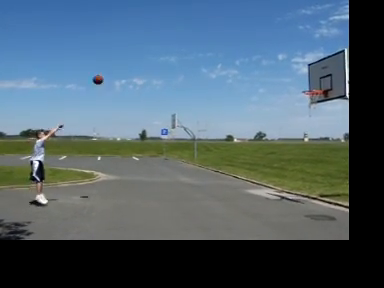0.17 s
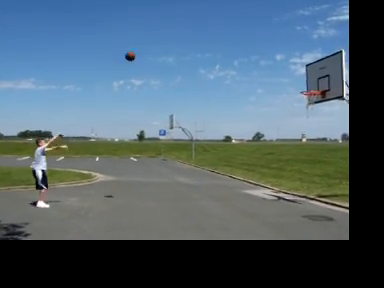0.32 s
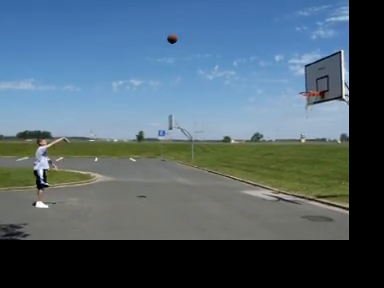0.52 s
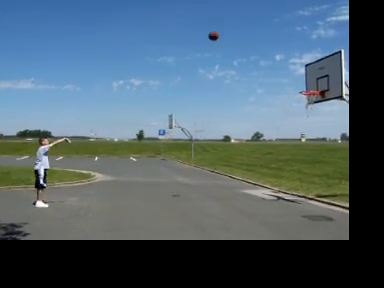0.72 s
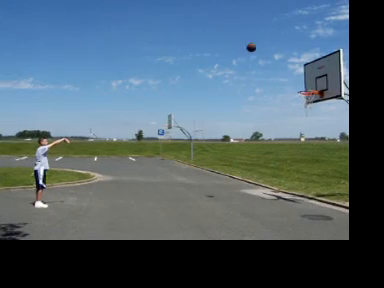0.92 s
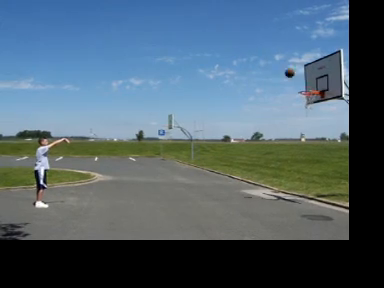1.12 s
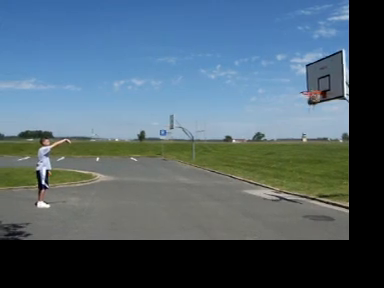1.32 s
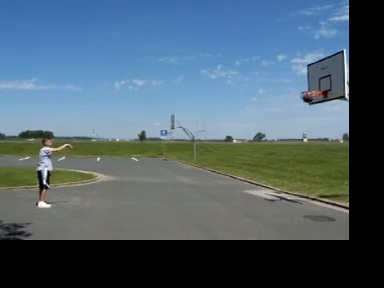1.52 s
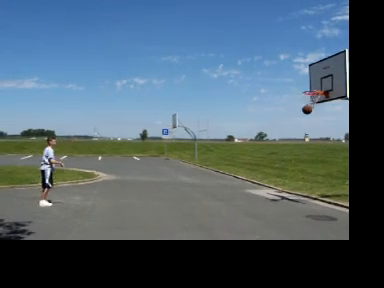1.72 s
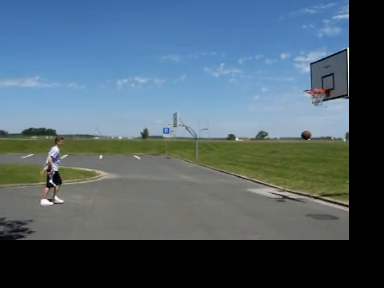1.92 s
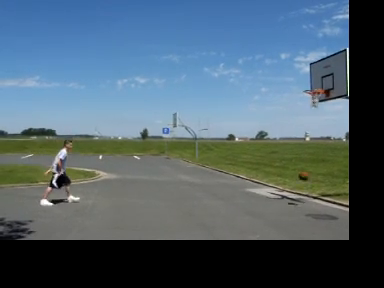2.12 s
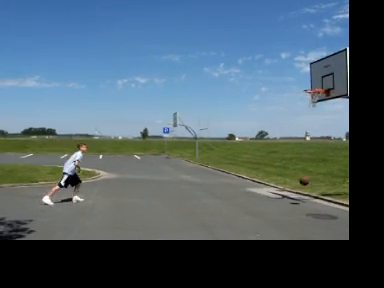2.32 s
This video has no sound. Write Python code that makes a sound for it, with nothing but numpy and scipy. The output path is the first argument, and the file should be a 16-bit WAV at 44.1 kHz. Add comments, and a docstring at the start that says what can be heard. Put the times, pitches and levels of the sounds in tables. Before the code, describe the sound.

Basketball hitting a steel hoop with a loud rattling clang, followed by one hard ground bounce.

```python
"""An open asphalt court, where a jump shot is played against an open-air background of hiss and rumble.
The shooter's shoes slap down as bursts of coloured noise. The ball clangs on the steel rim (noise cracks
and decaying modes), which rattles in its mount (random knocks) while board and pole hum on.
The ball brushes through the net as grainy noise, then smacks the ground: noise, a double skin thud and
air modes. This overloads the microphone, and two echoes and a scattered tail come back."""
import sys
import numpy as np
from scipy import signal
from scipy.fft import rfft, irfft, next_fast_len
from scipy.io import wavfile
from scipy.ndimage import uniform_filter1d

SR = 44100
rng = np.random.default_rng(int(sys.argv[2]) if len(sys.argv) > 2 else 0)


def dump_mix(stems):
    """Bounce the given channels to the path in sys.argv[1] as a 16-bit WAV at rate SR."""
    frames = np.atleast_2d(stems).T  # one column per channel
    limited = np.clip(frames, -1, 1)  # hard clip at full scale
    pcm = np.round(limited * 32767).astype(np.int16)
    wavfile.write(sys.argv[1], SR, pcm)


N = 104781  # length in samples

# Open-air hiss and rumble, spectral density: [frequency_hz, relative_db]
AIR_SPECTRUM = [(25, 1.5), (54, -4), (110, -2.5), (145, -0.5), (220, -6), (330, -7.5), (500, -9),
                (840, -13), (1500, -13.5), (3000, -10.5), (4800, -11), (6600, -17.5), (8200, -26.5),
                (9000, -32.5)]
AIR_DB = -42

# Shoe slaps: [start_s, level_db]
SHOE_SLAPS = [(0.3101, -29.5), (0.3177, -30), (0.327, -31.5), (0.339, -40), (.3450, -34), (0.3585, -39)]
# Spectral density of a slap: [frequency_hz, relative_db]
SHOE_SPECTRUM = [(50, -0.5), (200, 0.5), (750, 5.5), (1200, -11.5), (3500, -6), (5500, -11), (8000, -25.5)]
# Pop of the sole: [pitch_hz, level_db, t60_s]
SOLE_MODES = [(763, -37.5, 0.053)]
SHOE_T60_S, SOLE_START_S = 0.032, 0.346

# Blows of the ball on the rim: [start_s, level_db, crack_t60_s, treble_edge_hz]
RIM_BLOWS = [(1.2988, -12.5, 0.03, 4500), (1.2998, -14, 0.016, 8000), (1.3022, -12.5, 0.0095, 8100),
             (1.3108, -29.5, 0.017, 5000), (1.3875, -21.5, 0.076, 3280)]
# Spectral density of the crack: [frequency_hz, relative_db]
CRACK_SPECTRUM = [(100, -9), (500, 0), (1000, -8), (1550, 6), (1950, 1.5), (2450, 3), (2900, -9.5),
                  (3800, 0), (5200, -9.5), (7000, -13.5), (9000, -40)]
# Modes of the steel rim: [pitch_hz, relative_db, t60_s]
RIM_MODES = [(334, -9, .5), (415, -6, .3), (436, -2, .36), (712, -11, .25), (780, -9, .3), (1147, -8, .35),
             (1270, -2, .22), (1356, -3, .18), (1836, -10, .22), (2099, -5, .16), (2374, -8, .17),
             (2482, 0, .15), (2611, -8, .17), (3225, -8, .13), (3300, -8, .15)]
STEEL_DB = -21.5  # ring of the steel relative to the crack

# Loudness curve of the rim rattling in its mount: [time_s, level_db]
RATTLE_LEVEL = [(1.304, -36), (1.312, -29), (1.319, -36), (1.326, -22), (1.348, -20.5), (1.364, -24.5),
                (1.376, -34), (1.40, -52), (1.47, -66.5)]
# Spectral density of the rattle: [frequency_hz, relative_db]
RATTLE_SPECTRUM = [(100, -25), (420, 0.5), (900, -12.5), (1330, 3.5), (1900, -13), (3300, -9.5),
                   (5300, -17), (7000, -21.5), (9000, -34)]
# Twang that sags and recovers as the rim flexes: [time_s, pitch_hz]
TWANG_PITCH = [(1.320, 3200), (1.326, 2600), (1.336, 2250), (1.348, 2480), (1.364, 2400), (1.373, 2750)]
KNOCKS_PER_S, KNOCK_SPREAD_DB = 3500, 3
TWANG_WIDTH_HZ, TWANG_DB, RATTLE_RING_DB = 150, -7.5, -7.5

# Modes of backboard and pole: [pitch_hz, level_db, t60_s]
BOARD_MODES = [(48.4, -39, 3), (97, -17.5, .27), (110, -30, .7), (150.7, -39, 3.5), (172, -33, .7),
               (241, -26, .6), (247.6, -37.5, 3.5), (296.1, -36.5, 2.8), (199.2, -37, 4), (328.4, -45, 3),
               (446.8, -47, 3), (538.3, -50, 3.5), (640.6, -52, 4)]
# Close pair of pole modes that beat slowly: [pitch_hz, relative_db, t60_s]
POLE_MODES = [(402.5, -43, 12), (403.8, -43, 12)]
# Shaking of the board by the blow and by the tug on the net: [start_s, level_db, rise_s, t60_s]
BOARD_SHAKES = [(1.305, -31, 0.068, 0.98), (1.535, -36.5, .04, 4.4)]
# Spectral density of the shaking: [frequency_hz, relative_db]
SHUDDER_SPECTRUM = [(30, -19), (70, 4.5), (150, -1.5), (300, -4.5), (500, -6.5), (900, -16), (2000, -15),
                    (5000, -22.5), (9000, -35.5)]
BOARD_LAG_S, BOARD_RISE_S, POLE_DB = 0.00605, 0.0029, -4

# Dull clatter that trails the rattle, spectral density: [frequency_hz, relative_db]
CLATTER_SPECTRUM = [(120, -14), (300, 6), (450, -1.5), (800, 5.5), (1000, -4.5), (1300, 1.5), (1900, -20.5),
                    (3500, -28.5), (9000, -45)]
CLATTER_START_S, CLATTER_DB, CLATTER_T60_S, CLATTER_GRAIN_DB = 1.39, -31.5, 0.54, 3.5

# Brushes of the ball through the net: [start_s, level_db, rise_s, t60_s]
NET_BRUSHES = [(1.533, -35.5, 0.022, 0.52), (1.626, -33.5, 0.0043, 0.16), (1.685, -40, 0.0057, 0.42),
               (1.952, -34.5, 0.0051, 0.36)]
# Spectral density of the cords: [frequency_hz, relative_db]
NET_SPECTRUM = [(300, -10), (1200, -7.5), (2300, 0.5), (3300, -2.5), (4600, 3), (6000, -5.5), (7700, -3),
                (9000, -13.5)]
NET_GRAIN_DB = 2
TICK_START_S, TICK_DB, TICK_T60_S, TICK_LOW_HZ = 2.205, -25.5, 0.0035, 3600

# Spectral density of the ball's smack on the ground: [frequency_hz, relative_db]
SMACK_SPECTRUM = [(100, -4), (400, 5), (900, -1), (1300, 2), (2100, 6.5), (2450, -3), (3000, -0.5),
                  (3800, -1.5), (5500, -10), (7500, -16.5), (9000, -28)]
# Mode of the ball's skin: [pitch_hz, relative_db, t60_s]
SKIN_MODES = [(203, 5, 0.013)]
# Modes of the air inside the ball: [pitch_hz, level_db, t60_s]
CAVITY_MODES = [(1001, -30, .17), (1026, -34, .17), (1270, -25, .1), (1545, -31, .1), (1781, -31, .12),
                (2099, -26, .12), (2209, -31, .15), (2700, -28, .09), (2995, -28, .11), (3365, -32, .09),
                (3914, -30, .05)]
BOUNCE_START_S, SMACK_DB, SMACK_T60_S = 2.2858, -2.5, 0.025
CONTACT_S, RELEASE_T60_S = 0.0077, 0.01
LIFT_S, LIFT_DB, THUD_LOW_HZ = 0.00729, -5.5, 70

# Single echoes of the bounce: [delay_s, gain_db, bass_edge_hz, treble_edge_hz]
BOUNCE_ECHOES = [(0.0279, -13.5, 720, 3500), (.045, -13, 39.3, 3540)]
# Spectrum of the sound scattered by the court: [frequency_hz, relative_db]
COURT_SPECTRUM = [(60, -11), (200, -12.5), (600, -5), (1400, -3), (3000, -9.5), (5000, -5.5), (9000, -6)]
COURT_RISE_S, COURT_T60_S = 0.028, 0.5
HOOP_WET_DB, GROUND_WET_DB = -21, -10.5

# Frequency response of the microphone: [frequency_hz, gain_db]
MICROPHONE_RESPONSE = [(15, -22), (30, -2), (48, 0), (7200, 0), (8200, -9), (9000, -14.5)]
OVERLOAD_CEILING, BAND_EDGE_HZ = 0.8, 8750


def amp(db):
    """Logarithmic level: decibels to amplitude gain."""
    return 10 ** (np.asarray(db) / 20)


def unit(x):
    """Normalisation: scales a signal to rms 1."""
    return x / np.sqrt(np.mean(x ** 2) + 1e-20)


def colour(x, points):
    """Linear filtering: weights the spectrum by (Hz, dB) points joined on a log-frequency axis."""
    hz, db = np.transpose(points)
    f = np.fft.rfftfreq(len(x), 1 / SR)
    gain = amp(np.interp(np.log(f + 1), np.log(hz + 1), db))
    return irfft(rfft(x) * gain, len(x))


def noise(points):
    """Random excitation: Gaussian noise of a given spectrum and rms 1."""
    return unit(colour(rng.standard_normal(N), points))


def fade(start, t60, rise=.0002):
    """Damping: a linear rise, then exponential decay by 60 dB in t60 seconds."""
    t = np.maximum(np.arange(N) / SR - start, 0)
    decay = amp(-60 * np.maximum(t - rise, 0) / t60)
    return np.minimum(t / rise, 1) * decay


def ring(modes, start, rise=0.00016):
    """Modal superposition: damped sinusoids struck together."""
    t = np.arange(N) / SR - start
    return sum(amp(db) * fade(start, t60, rise) * np.sin(2 * np.pi * hz * t) for hz, db, t60 in modes)


def band(x, low_hz, high_hz):
    """Causal band-pass filtering, which keeps the attack sharp."""
    edges = [low_hz, min(high_hz, SR / 3)]
    return signal.sosfilt(signal.butter(3, edges, "bandpass", fs=SR, output="sos"), x)


def grainy(depth_db):
    """Amplitude modulation: an uneven level of rms 1 that changes every few milliseconds."""
    wander = unit(uniform_filter1d(rng.standard_normal(N), size=120))
    return unit(amp(depth_db * wander))


def resonate(x, hz, width_hz):
    """Moving resonance: shifts the curve hz to zero frequency, low-passes and shifts back; peak gain 1."""
    turn = np.exp(2j * np.pi * np.cumsum(hz) / SR)
    r = np.exp(-np.pi * width_hz / SR)
    return 2 * (turn * signal.lfilter([1 - r], [1, -r], x / turn)).real


def open_air():
    """Stationary random sound: steady coloured noise as background hiss and rumble."""
    return amp(AIR_DB) * noise(AIR_SPECTRUM)


def shoes():
    """Impact noise: toes and heels slap the asphalt in damped bursts, and the sole pops as a mode."""
    level = sum(amp(db) * fade(start, SHOE_T60_S) for start, db in SHOE_SLAPS)
    return noise(SHOE_SPECTRUM) * level + ring(SOLE_MODES, SOLE_START_S)


def clang():
    """Impulsive excitation: each blow makes a noise crack and sets the steel's modes ringing."""
    total = 0
    for start, db, t60, edge_hz in RIM_BLOWS:
        crack = band(noise(CRACK_SPECTRUM) * fade(start, t60), 20, edge_hz)
        steel = amp(STEEL_DB) * ring(RIM_MODES, start)
        total = total + amp(db) * (crack + steel)
    return total


def rattle():
    """Repeated random impacts: knocks in the mount drive a gliding resonance and the rim's modes."""
    struck = rng.random(N) < KNOCKS_PER_S / SR
    sign = rng.choice([-1, 1], N)
    strength = amp(KNOCK_SPREAD_DB * rng.standard_normal(N))
    knocks = unit(struck * sign * strength)
    t = np.arange(N) / SR
    level = amp(np.interp(t, *np.transpose(RATTLE_LEVEL), left=-120, right=-120))
    modes = ring(RIM_MODES, 0)
    rung = signal.fftconvolve(knocks * level, modes / np.linalg.norm(modes))[:N]
    twang = unit(resonate(knocks, np.interp(t, *np.transpose(TWANG_PITCH)), TWANG_WIDTH_HZ))
    body = unit(colour(knocks, RATTLE_SPECTRUM))
    return level * (body + amp(TWANG_DB) * twang) + amp(RATTLE_RING_DB) * rung


def backboard():
    """Modal decay and beating: board and pole thump and hum on, with a noisy shudder."""
    start = RIM_BLOWS[0][0] + BOARD_LAG_S
    board = ring(BOARD_MODES, start, BOARD_RISE_S)
    pole = amp(POLE_DB) * ring(POLE_MODES, start, BOARD_RISE_S)
    shaking = sum(amp(db) * fade(s, t60, rise) for s, db, rise, t60 in BOARD_SHAKES)
    return board + pole + noise(SHUDDER_SPECTRUM) * shaking


def court(x, wet_db):
    """Diffuse scattering: convolves with a decaying noise tail of unit energy."""
    tail = noise(COURT_SPECTRUM) * fade(0, COURT_T60_S, rise=COURT_RISE_S)
    return amp(wet_db) * signal.fftconvolve(x, tail / np.linalg.norm(tail))[:N]


def clatter():
    """Damped random sound: a dark clatter trails the rattle as grainy, fading noise."""
    level = amp(CLATTER_DB) * fade(CLATTER_START_S, CLATTER_T60_S, rise=.008)
    return noise(CLATTER_SPECTRUM) * grainy(CLATTER_GRAIN_DB) * level


def net():
    """Friction noise: cords rub grainily on the ball; one faint tick follows."""
    level = sum(amp(db) * fade(start, t60, rise) for start, db, rise, t60 in NET_BRUSHES)
    brush = noise(NET_SPECTRUM) * grainy(NET_GRAIN_DB) * level
    tick = amp(TICK_DB) * band(noise(NET_SPECTRUM) * fade(TICK_START_S, TICK_T60_S), TICK_LOW_HZ, SR)
    return brush + tick


def bounce():
    """Elastic impact: a smack while the ball is squashed, a double skin thud and the ping of its air."""
    since_release = np.maximum(np.arange(N) / SR - BOUNCE_START_S - CONTACT_S, 0)
    contact = amp(-60 * since_release / RELEASE_T60_S)
    smack = amp(SMACK_DB) * noise(SMACK_SPECTRUM) * fade(BOUNCE_START_S, SMACK_T60_S) * contact
    first_thud = ring(SKIN_MODES, BOUNCE_START_S)
    # the skin thuds again as the ball springs back
    second_thud = amp(LIFT_DB) * ring(SKIN_MODES, BOUNCE_START_S + LIFT_S)
    thud = band(first_thud + second_thud, THUD_LOW_HZ, SR)
    return smack + thud + ring(CAVITY_MODES, BOUNCE_START_S)


def echoes(x):
    """Discrete reflection: delayed, band-limited copies of the bounce."""
    return sum(amp(db) * np.pad(band(x, low_hz, high_hz), (round(delay * SR), 0))[:N]
               for delay, db, low_hz, high_hz in BOUNCE_ECHOES)


def scene():
    """Linear superposition: all sources and reflections over the open-air background."""
    rim = clang() + rattle()
    hoop = rim + court(rim, HOOP_WET_DB) + backboard() + clatter() + net()
    ball = bounce()
    ground = ball + echoes(ball) + court(ball, GROUND_WET_DB)
    return (open_air() + shoes() + hoop + ground)[None]


def record(dry):
    """Saturation, then linear filtering: peak overload, the microphone's colour and a band limit."""
    clipped = dry[0] / (1 + (dry[0] / OVERLOAD_CEILING) ** 6) ** (1 / 6)
    # silence appended so that the filter does not wrap round
    padded = np.pad(clipped, (0, next_fast_len(N + SR) - N))
    heard = colour(padded, MICROPHONE_RESPONSE)[:N]
    low_pass = signal.firwin(255, BAND_EDGE_HZ, window=("kaiser", 9), fs=SR)
    return signal.oaconvolve(heard, low_pass, "same")[None]


dry = scene()
out = record(dry)
dump_mix(out)
```